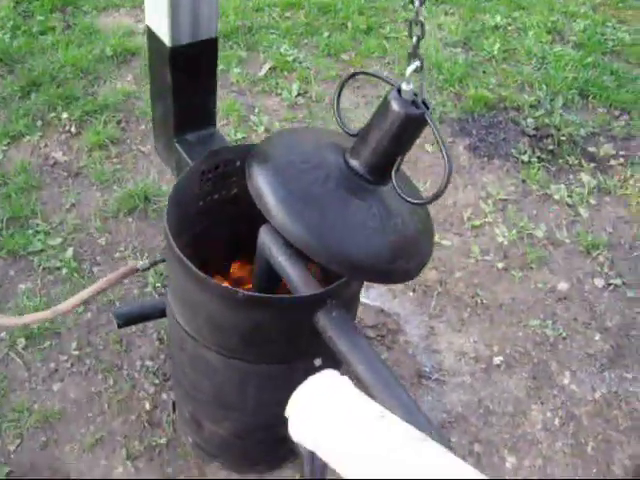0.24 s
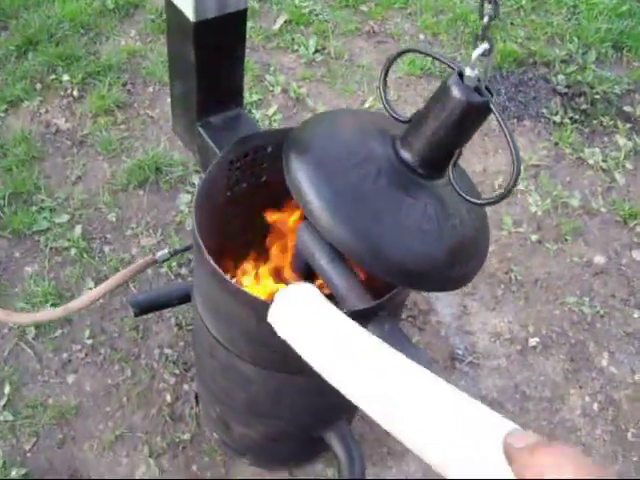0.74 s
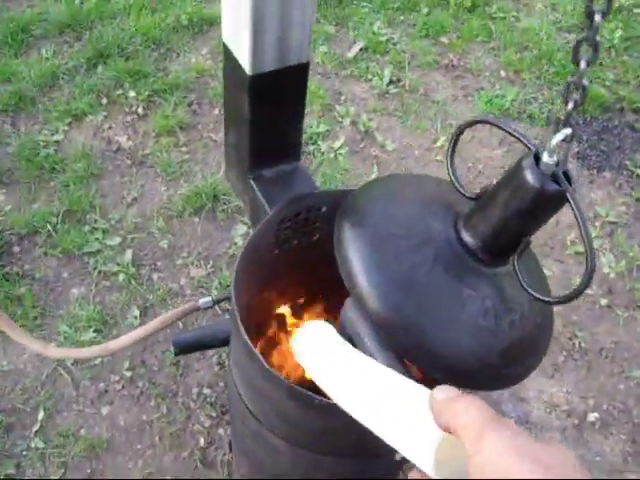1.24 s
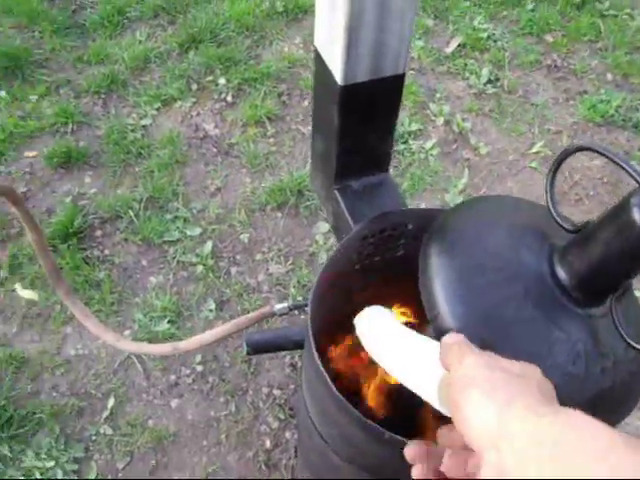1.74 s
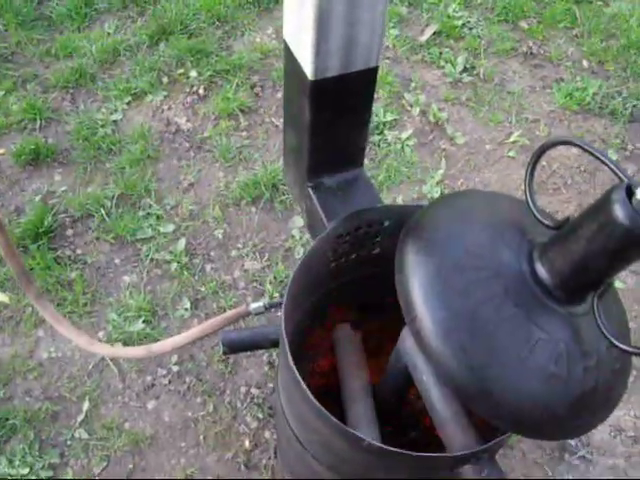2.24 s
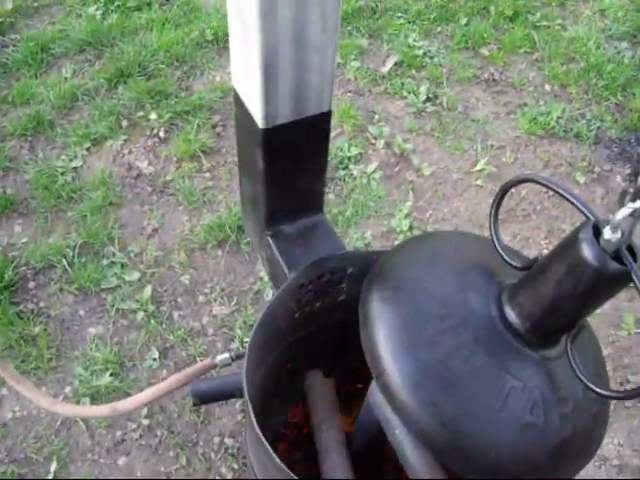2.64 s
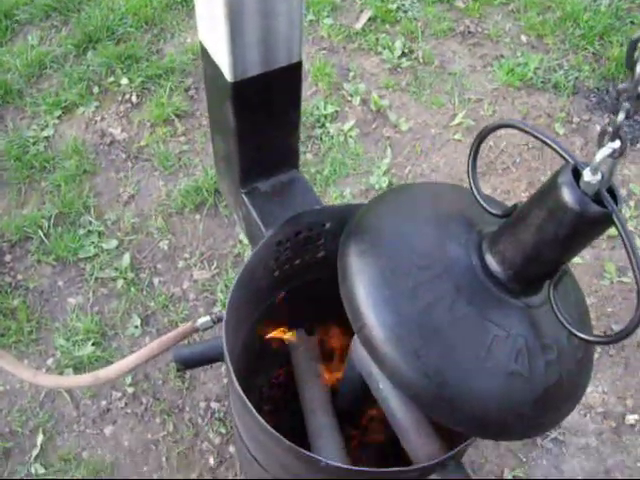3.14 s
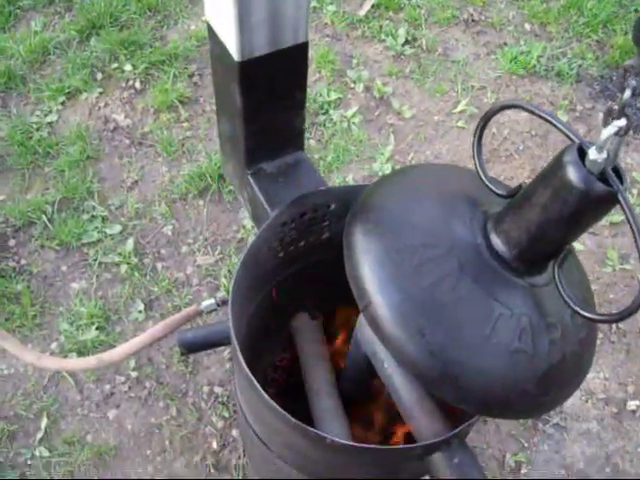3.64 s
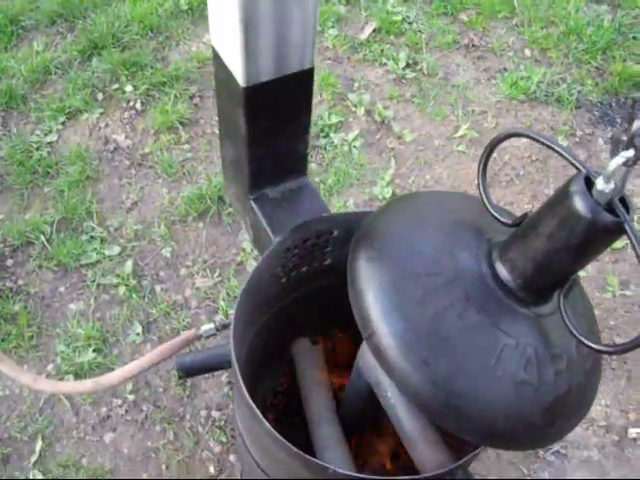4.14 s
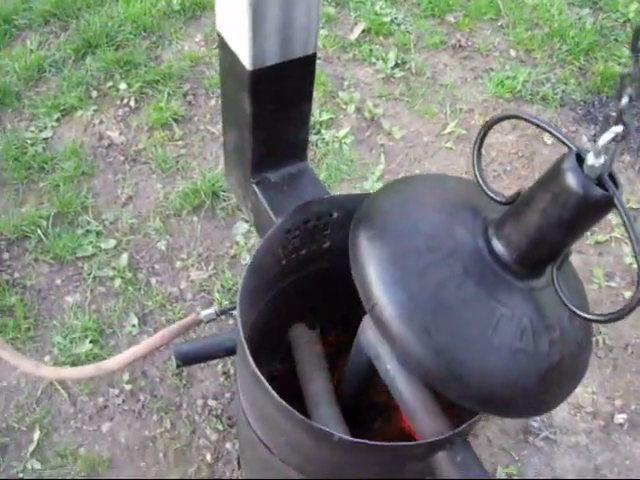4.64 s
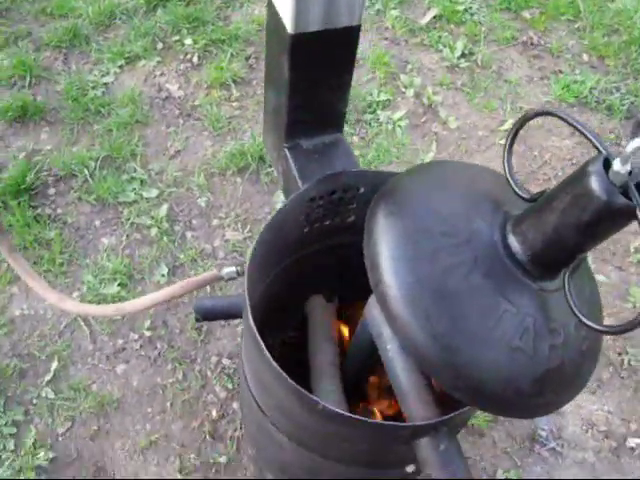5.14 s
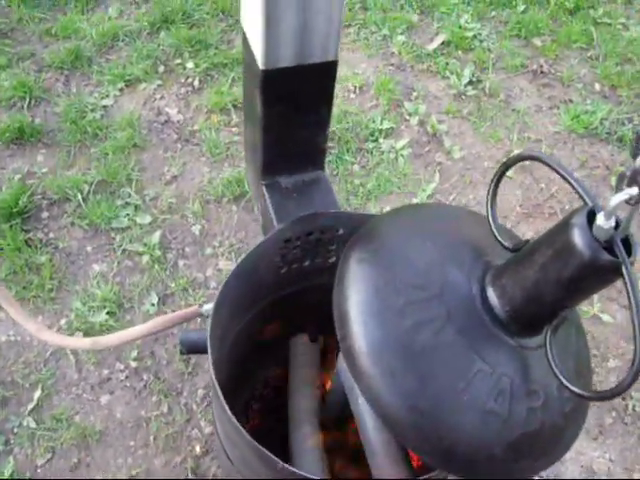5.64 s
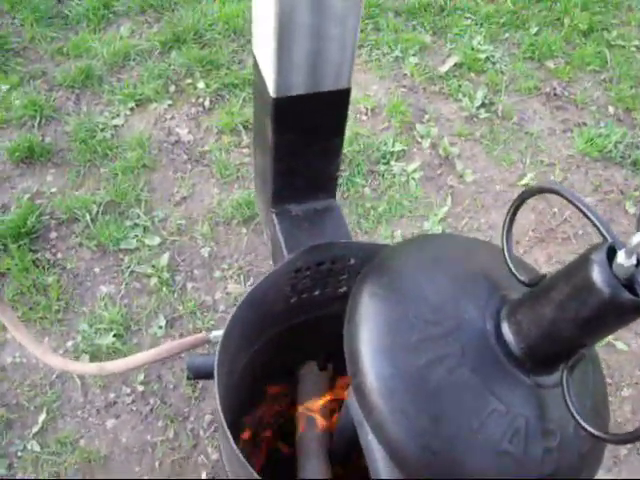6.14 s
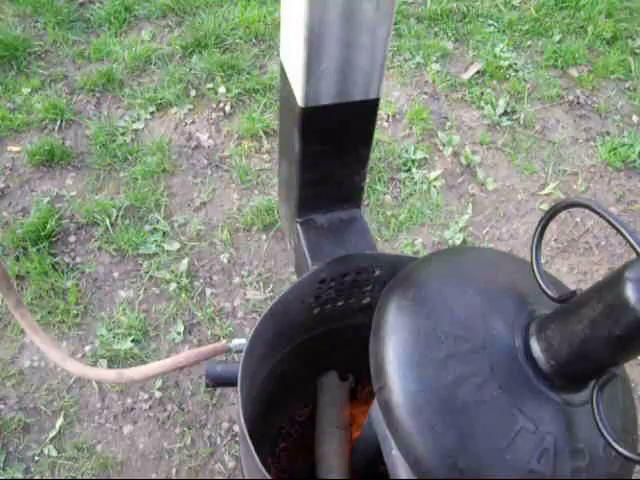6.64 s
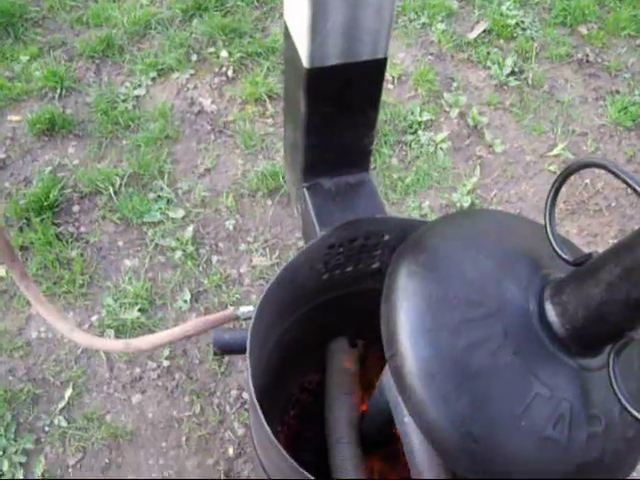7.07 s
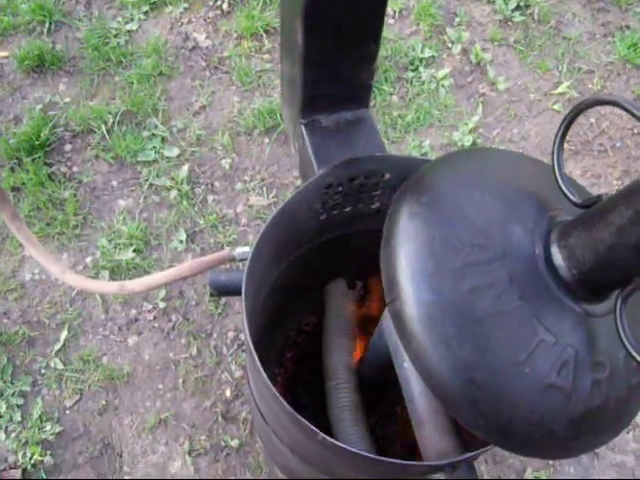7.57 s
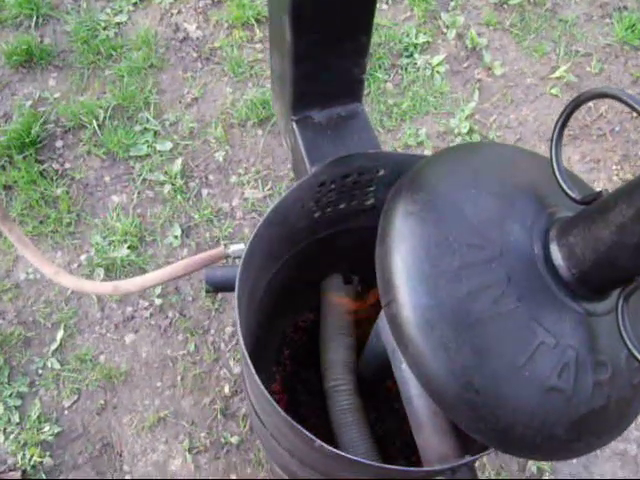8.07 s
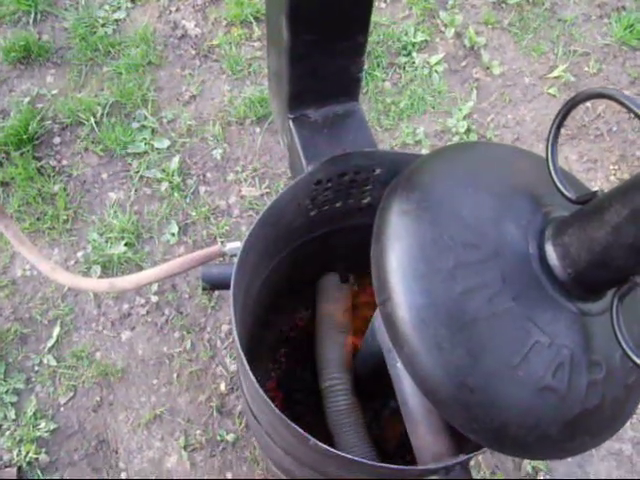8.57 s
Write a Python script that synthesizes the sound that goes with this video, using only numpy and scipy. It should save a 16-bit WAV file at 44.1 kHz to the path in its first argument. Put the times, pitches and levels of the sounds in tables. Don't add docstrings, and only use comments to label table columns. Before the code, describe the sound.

A forced fire burns without pause in an open steel drum outdoors. Its low, hollow roar, centred near 250 Hz, flutters fast over soft rumble, with drum and flue resonances and a steady blown-air hiss above. It starts slightly weaker and more distant, with a click at 0 s, and builds by 0.7 s. From about 0.9 to 2.5 s the listener approaches; the sound becomes fuller and closer, while hiss swells near 1 s and brightens briefly at 1.9 s. A thin, faint hum near 930 Hz emerges. The roar dips around 4 to 4.8 s, flares briefly at 4.6, then strengthens after 5 s and stays strong to the end, around 8.8 s. Hard clicks fall at 0.44, 1.44 (harshest), 3.44, 4.43, 5.43, 6.43, 7.43 and 8.43 s. The small microphone is overloaded, grainy and dull above 5 kHz.

```python
import sys
import numpy as np
from scipy import signal
from scipy.io import wavfile
from scipy.ndimage import uniform_filter1d

SR = 44100
rng = np.random.default_rng(int(sys.argv[2]) if len(sys.argv) > 2 else 0)


def store_wav(level_fs):
    pcm = np.round(np.clip(np.atleast_2d(level_fs), -1, 1) * 32767)
    wavfile.write(sys.argv[1], SR, pcm.T.astype(np.int16))


def nominal_scale(level):
    x = np.asarray(level, float) / 20
    return 10 ** x


N = 388521

# time_s, drum_roar_db, mouth_flames_db
FIRE = [(0.0, -18.5, -2.7), (0.2, -14.5, -2.5), (0.7, -11.5, -1), (1.3, -11.5, -0.3), (2.0, -13.5, -0.5),
        (2.6, -12.5, -3), (2.95, -11.2, 1.3), (3.6, -11.0, -0.3), (4.1, -13, 0.9), (4.8, -13.5, -1.5),
        (5.1, -9, 0.8), (5.6, -9.5, 1), (6.0, -9.9, 1), (6.5, -11.5, 3), (7.0, -10.7, 0.8),
        (7.7, -9.5, -0.2), (8.3, -10.5, 1.6), (8.81, -11, 2.5)]
# centre_s, change_db, spread_s
SURGES = [(0.15, 5, .026), (0.42, -4.5, .02), (0.6, -2.5, .018), (0.69, -4.5, .02), (1.04, -4.5, .015),
          (1.18, -3.5, .02), (1.45, 3.5, .02), (1.66, 2.5, .017), (1.72, -6.5, .018), (1.9, 4, .015),
          (2.07, -4, 0.017), (2.43, -4.5, .02), (2.8, 3.5, .019), (3.01, 3, .02), (3.61, 2.5, .03),
          (3.89, 4, .03), (4.17, -3.8, .02), (4.5, -2.5, .022), (4.61, 6.5, .02), (4.82, -2.5, .017),
          (5.17, 3.5, .015), (5.34, -2.5, .05), (5.63, -2.5, .022), (6.12, -3, .022), (6.6, -3.5, .02),
          (6.76, 3, 0.028), (7.49, -5, .02), (7.94, -2.5, 0.022), (8.07, -3, .018), (8.58, -4.5, 0.037)]
# time_s, nearness_0_to_1
NEARNESS = [
    (0, 0),
    (.85, .1),
    (1.1, .35),
    (1.6, .55),
    (2.5, 1),
    (8.81, 1),
]
# centre_hz, width_hz, far_db, near_db
DRUM_MODES = [(246.8, 32.5, 2, 1), (159, 27, -11, -14.5), (345.2, 45, -12, -15.5), (217, 40, -8.5, -7.5),
              (294.9, 40, -8, -11.5)]
# centre_hz, width_hz, far_db, near_db
UPPER_MODES = [(521.4, 110, -7.5, 1), (609.5, 70, 0.5, -0.5), (680, 40, -3, -9), (791, 80, -2.5, 0.5),
               (877, 60, -2, -6)]
# centre_hz, width_hz, far_db, near_db
FLUE_MODES = [(1095, 150, -8, 1.5), (1204, 150, 0.5, -3), (1385, 250, -1, -4), (1607, 180, -4.5, -3)]
# time_s, roar_db
DRAUGHT = [(0.0, -36), (0.44, -32), (0.66, -29.5), (1.23, -30.5), (2.3, -35.5), (2.94, -31.5), (3.21, -35),
           (3.58, -34.5), (3.78, -31.5), (4.14, -33), (4.46, -31.5), (5.13, -33.5), (5.52, -32.5),
           (5.74, -33.5), (6.63, -32), (7.19, -33), (8.81, -30)]
# frequency_hz, density_db_per_hz
JET_SPECTRUM = [(1060, -30), (1800, -4.5), (1910, -3.5), (2140, 1.5), (2320, -1), (2640, 0.5), (3600, 0),
                (3920, -3.5), (4210, -2.5), (4880, -4.5), (5190, -8), (5600, -30), (7280, -47.5),
                (12300, -120)]
# centre_hz, width_hz, far_db, near_db
EDGE_TONES = [(3000, 60, 0, -20), (3330, 60, -1, -20)]
# time_s, hiss_db, microphone_turn_db
HISS = [(0.0, -41, 1), (0.17, -39.5, 1), (1.15, -33, -5), (1.94, -37.5, 2.5), (2.23, -36.5, 0),
        (2.55, -38, 0), (2.92, -38, -1.5), (3.31, -42.5, 1), (4.27, -40.5, -1), (4.46, -37, 4),
        (4.98, -36, -1), (5.89, -36.5, 0.5), (6.48, -34, 0), (7.51, -35, 1), (7.75, -37, 1.5),
        (7.97, -37.5, 0), (8.49, -32.5, 0), (8.81, -34.5, 0)]
# centre_s, gain_db, spread_s
CROSSINGS = [
    (0.98, 2.5, .08),
    (1.9, 3.5, .04),
]
# frequency_hz, density_db_per_hz
RUMBLE_SPECTRUM = [(12, -47.5), (20, -11.5), (102, -4), (140, -1.5), (180, -33.5), (310, -120)]
# time_s, jump_fs, mid_level_fs, kink_fs, rise_samples
JOINS = [
    (0, 0, .38, .1, 1),
    (.44102, .34, -.1, 0, 1.8),
    (1.43946, 2, 0, 0, 1.7),
    (3.43637, .42, 0, 0, 1.1),
    (4.43482, 1.1, -.2, 0, 1.6),
    (5.43329, -.14, -.1, .7, .5),
    (6.43175, .6, -.1, 0, 1.65),
    (7.4302, .27, .1, -.5, .5),
    (8.42866, .11, 0, 0, .6),
]
# start_s, length_s
FLIPS = [
    (1.4395, .00007),
    (1.439705, .00005),
]


def in_time(rows):
    time_s, *columns = np.transpose(rows)
    return [np.interp(np.arange(N) / SR, time_s, column) for column in columns]


def surges(rows):
    t = np.arange(0, N, 40) / SR
    bells = sum(db * np.exp(-.5 * ((t - s) / spread) ** 2) for s, db, spread in rows)
    return np.interp(np.arange(N) / SR, t, bells)


def rms_one(x):
    return x / np.sqrt(np.mean(x ** 2) + 1e-20)


def drift(rate_hz):
    hop = 40
    r = np.exp(-2 * np.pi * hop * rate_hz / SR)
    noise = rng.standard_normal(N // hop + 2002)
    slow = signal.lfilter([1], [1, -2 * r, r * r], noise)[2000:]
    return np.interp(np.arange(N) / hop, np.arange(len(slow)), rms_one(slow))


RUN_IN = 8000


def resonate(x, hz, width_hz):
    r = np.exp(-np.pi * width_hz / SR)
    poles = [1, -2 * r * np.cos(2 * np.pi * hz / SR), r * r]
    return signal.lfilter([(1 - r * r) / 2, 0, (r * r - 1) / 2], poles, x)


def zero_phase(x, order, hz, kind):
    return signal.sosfiltfilt(signal.butter(order, hz, kind, fs=SR, output="sos"), x)


def air_modes(modes, near, flutter_db, patchy_db, rate_hz):
    out = 0
    for hz, width_hz, far_db, near_db in modes:
        rung = rng.standard_normal(N + RUN_IN)
        for _ in range(2):
            rung = resonate(rung, hz, 1.49 * width_hz)
        level_db = far_db + near * (near_db - far_db) + flutter_db + patchy_db * drift(rate_hz)
        out = out + nominal_scale(level_db) * rung[RUN_IN:]
    return out


def banded(spectrum, per_octave, flutter_db, patchy_db, rate_hz):
    hz, density_db = np.transpose(spectrum)
    edges_hz = hz[0] * 2 ** np.arange(0, np.log2(hz[-1] / hz[0]), 1 / per_octave)
    white = rng.standard_normal((2, N + RUN_IN))
    out = 0
    for k, (low, high) in enumerate(zip(edges_hz, edges_hz[1:])):
        band_filter = signal.butter(2, [low, high], "band", fs=SR, output="sos")
        band = signal.sosfilt(band_filter, white[k % 2])[RUN_IN:]
        band_db = np.interp(np.log(low * high) / 2, np.log(hz), density_db)
        out = out + nominal_scale(band_db + flutter_db + patchy_db * drift(rate_hz)) * band
    return rms_one(out)


def evened(x, share, seconds):
    level = np.sqrt(uniform_filter1d(x ** 2, max(round(seconds * SR), 1)) + 1e-12)
    return rms_one(x / level ** np.clip(share, 0, 1))


def drum_roar(fire_db, surge_db, near, flutter):
    roar = air_modes(DRUM_MODES, near, 0.74 * flutter, patchy_db=0.24, rate_hz=4.2)
    return nominal_scale(fire_db + 1.3 * surge_db + 0.24) * evened(roar, share=0.59, seconds=.08)


def upper_roar(vigour_db, surge_db, mouth_db, near, flutter):
    level_db = -28.0 + 0.27 * vigour_db + 0.27 * surge_db + mouth_db
    roar = air_modes(UPPER_MODES, near, 1.6 * flutter, patchy_db=0.54, rate_hz=2.8)
    return nominal_scale(level_db) * evened(roar, share=.9, seconds=0.33)


def flue_roar(surge_db, near, flutter):
    pull_db, = in_time(DRAUGHT)
    roar = air_modes(FLUE_MODES, near, 1.4 * flutter, patchy_db=0.3, rate_hz=3.3)
    return nominal_scale(pull_db + .08 * surge_db + .6) * evened(roar, share=0.77, seconds=.3)


def jet(near, flutter):
    body_db, turn_db = in_time(HISS)
    edge_db = -41 + 1.1 * (body_db - body_db.mean()) + turn_db + surges(CROSSINGS)
    hiss = banded(JET_SPECTRUM, 9, .7 * flutter, patchy_db=1.15, rate_hz=2.5)
    hiss = hiss + nominal_scale(15) * air_modes(EDGE_TONES, near, 0, patchy_db=2.5, rate_hz=3)
    body = zero_phase(hiss, 3, 3500, "low")
    return nominal_scale(body_db - 1.23) * rms_one(body) + nominal_scale(edge_db) * rms_one(hiss - body)


def rumble(vigour_db, surge_db, mouth_db, near, flutter):
    level_db = -30.5 + 0.23 * vigour_db + 0.17 * surge_db + 0.33 * mouth_db + 2.5 * near
    noise = banded(RUMBLE_SPECTRUM, 3, 0.59 * flutter, patchy_db=-1.0, rate_hz=5.8)
    return nominal_scale(level_db) * evened(noise, share=.45, seconds=0.3)


def hum(near):
    pitch_hz = 927 + 2.5 * drift(2.5)
    far_db, near_db = -52, -40
    level_db = far_db + near * (near_db - far_db) + 2.5 * drift(4)
    return nominal_scale(level_db) * np.sin(2 * np.pi * np.cumsum(pitch_hz) / SR)


def ground_echo(x, near):
    depth = np.clip(1.15 - 3.5 * near, 0, 1)
    return x - depth * resonate(x, hz=468, width_hz=50)


def joins(x):
    out, roar, t = x.copy(), zero_phase(x, 2, 1500, "low"), np.arange(N)
    swing_hz, hold_s, reach = DRUM_MODES[0][0], .0042, 500
    for time_s, jump, middle, kink, rise in JOINS:
        centre = round(time_s * SR)
        at = slice(max(centre - reach, 0), centre + reach)
        since = t[at] - centre
        hold = np.exp(-(since / (hold_s * SR)) ** 2)
        turn = 2 * np.pi * swing_hz * np.abs(since) / SR
        step = middle + jump / 2 * np.tanh(since / rise)
        swing = step * np.cos(turn) + kink * np.sin(turn)
        out[:, at] += hold * (swing - roar[:, at])
    return out


def patchy_top(x, size=2048):
    low_hz, high_hz, margin_db = 5650, 6400, 19
    hz, _, lines = signal.stft(x, SR, nperseg=size)
    hiss_band = (hz > 3800) & (hz < 5200)
    hiss = np.sqrt(np.mean(np.abs(lines[:, hiss_band]) ** 2, axis=1, keepdims=True))
    within = ((hz > low_hz) & (hz < high_hz))[:, None]
    mood = uniform_filter1d(rng.standard_normal(lines.shape[1:]), 6, axis=0)
    mood_db = 22 * uniform_filter1d(mood, 5, axis=1)
    hidden = within & (np.abs(lines) < hiss * nominal_scale(mood_db - margin_db))
    return signal.istft(lines * ~hidden, SR, nperseg=size)[1][:, :N]


def scene():
    fire_db, mouth_db = in_time(FIRE)
    surge_db = surges(SURGES)
    near = np.clip(in_time(NEARNESS)[0], 0, 1)
    vigour_db = fire_db - fire_db.mean()
    flutter = drift(26)
    fire = drum_roar(fire_db, surge_db, near, flutter)
    fire = fire + upper_roar(vigour_db, surge_db, mouth_db, near, flutter)
    fire = fire + flue_roar(surge_db, near, flutter)
    fire = fire + jet(near, flutter)
    fire = fire + rumble(vigour_db, surge_db, mouth_db, near, flutter)
    fire = fire + hum(near)
    return ground_echo(fire, near)[None]


def roll_off(x):
    return signal.sosfilt(signal.butter(12, 12570, fs=SR, output="sos"), x)


def record(dry):
    x = np.clip(dry, -.972, .972)
    x = signal.sosfilt(signal.butter(8, 5200, fs=SR, output="sos"), x)
    x = np.clip(joins(x) - .0037, -1, 1)
    for start_s, length_s in FLIPS:
        x[:, round(start_s * SR):round((start_s + length_s) * SR)] = -1
    steps = 128
    x = np.round(x * steps + 0.19 * rng.standard_normal(x.shape)) / steps
    return roll_off(patchy_top(x))


dry = scene()
out = record(dry)
store_wav(out)
```